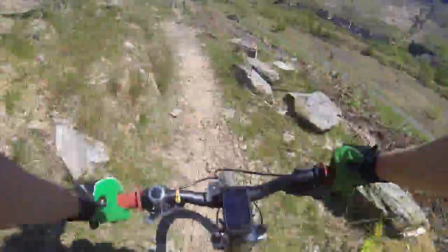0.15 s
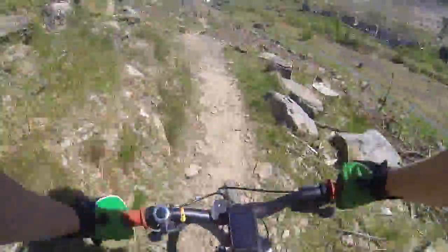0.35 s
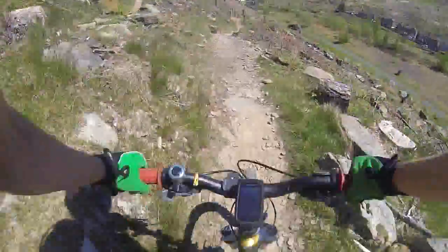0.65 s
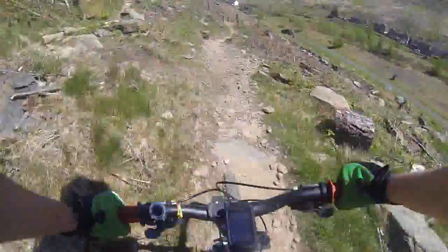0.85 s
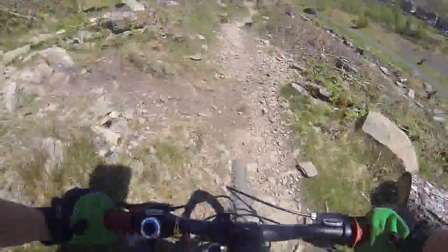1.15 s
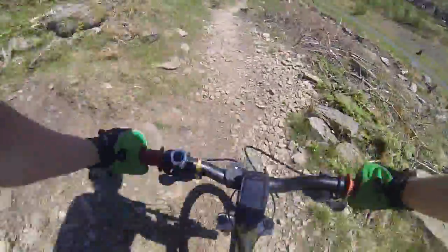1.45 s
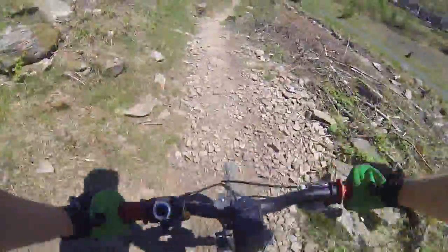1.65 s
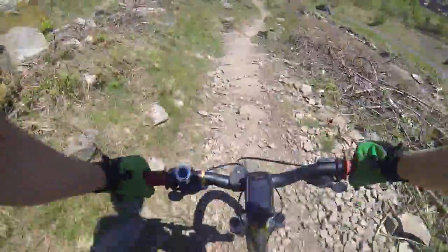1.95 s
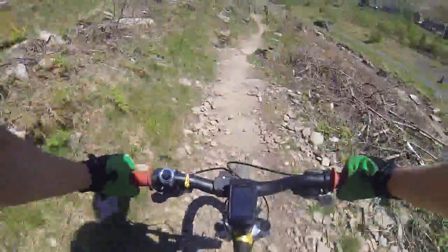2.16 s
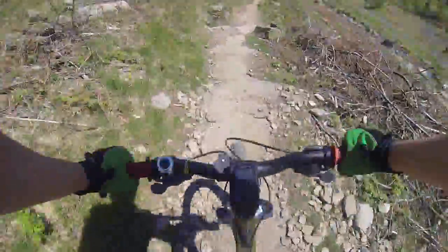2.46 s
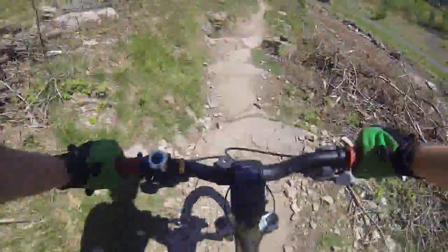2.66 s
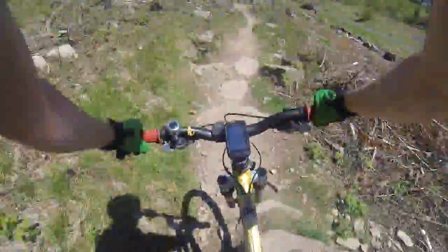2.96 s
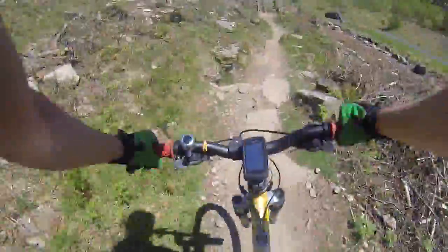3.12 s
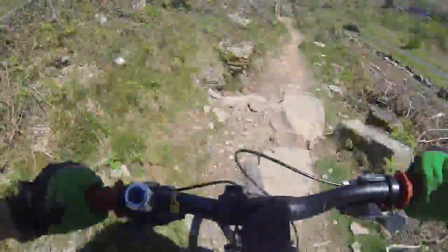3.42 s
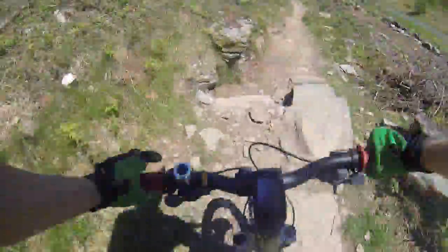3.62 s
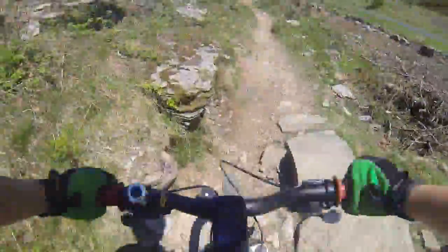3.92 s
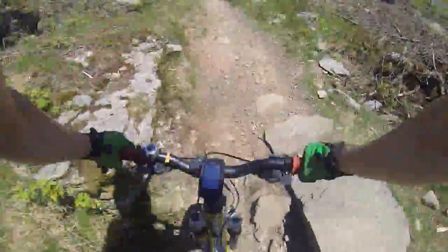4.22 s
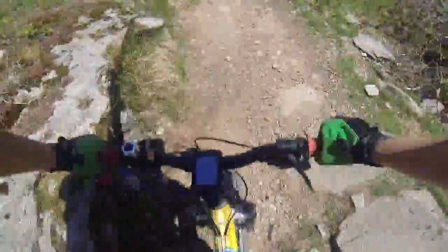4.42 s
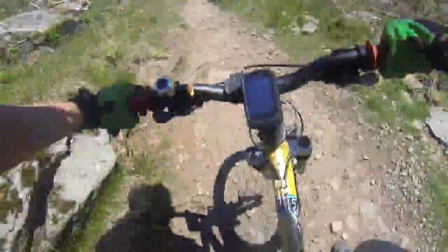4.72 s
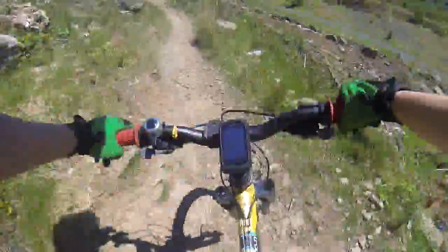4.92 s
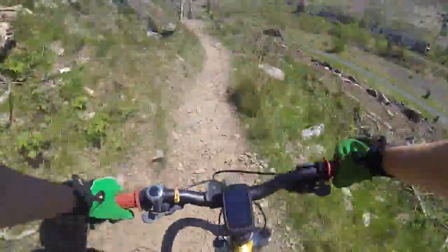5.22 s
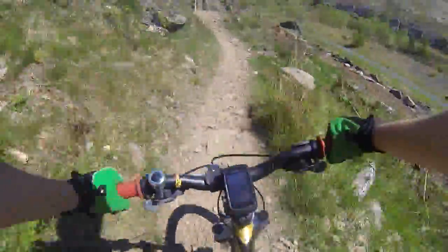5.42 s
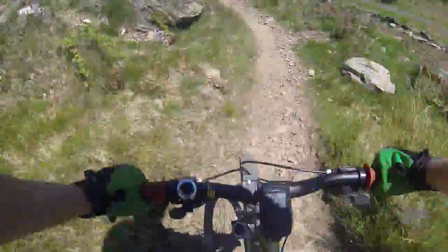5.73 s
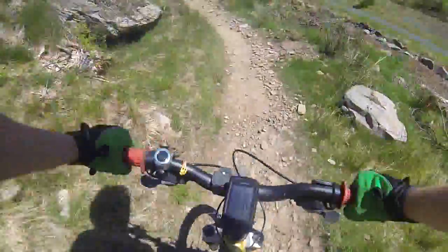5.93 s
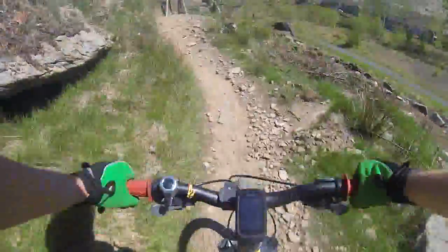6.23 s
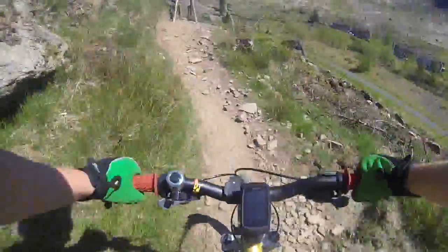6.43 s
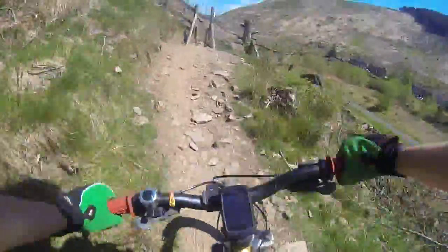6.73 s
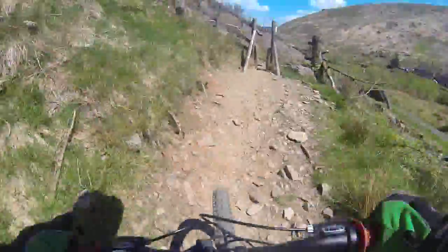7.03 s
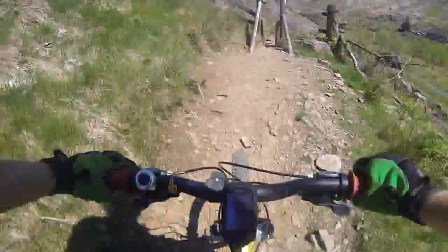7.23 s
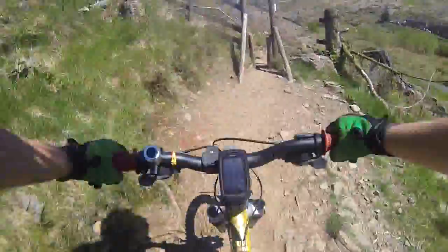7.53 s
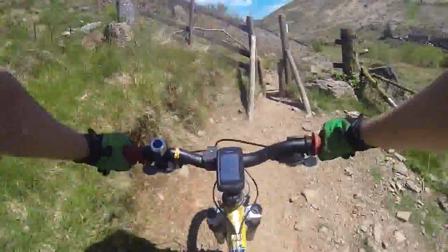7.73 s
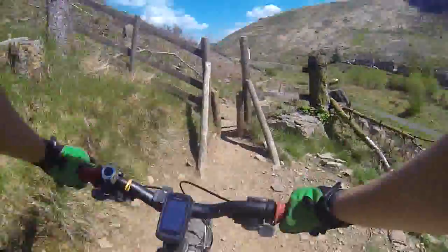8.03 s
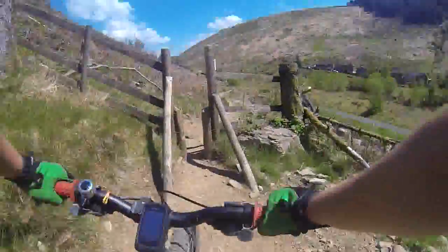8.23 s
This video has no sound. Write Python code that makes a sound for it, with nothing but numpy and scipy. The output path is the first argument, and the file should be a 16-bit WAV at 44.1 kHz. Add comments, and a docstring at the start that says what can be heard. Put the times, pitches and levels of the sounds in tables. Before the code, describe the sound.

A sealed camera case rattles and clacks on a rider's chest, with bassy jolts, low rumbling and dull tyre crunch over loose stones.

```python
"""A camera in a sealed plastic case knocks about on the chest of a mountain biker on a stony trail.
Each knock is a short ring, a buzz, a click and a hollow push, the last three sent through case resonances.
Jolts thump as short low swings with a scuff of the straps; a faint treble hiss is lumpy, coloured noise.
Behind them the body heaves, the harness shudders and the tyres crunch on gravel, muffled by the case."""
import sys
import numpy as np
from scipy import signal
from scipy.fft import rfft, irfft, next_fast_len
from scipy.io import wavfile
from scipy.ndimage import map_coordinates

SR = 44100
rng = np.random.default_rng(int(sys.argv[2]) if len(sys.argv) > 2 else 0)


def generate_wav(signal):
    """Clip the signal to [-1, 1] and save it as 16-bit WAV at the path in sys.argv[1]."""
    frames = np.transpose(np.atleast_2d(signal))
    scaled = np.clip(frames, -1, 1) * 32767
    pcm = np.round(scaled).astype(np.int16)
    wavfile.write(sys.argv[1], SR, pcm)


N = 369116

# Camera against case. Each row: start in seconds, level in dB, ring in Hz, click against the knock in dB.
KNOCKS = [(0.0148, -12, 1410, -60), (0.026, -21, 1560, -30.5), (0.044, -33, 1590, -27),
          (0.0935, -24, 1340, -67), (0.219, -29, 1580, -43), (0.267, -30, 1470, -40),
          (0.33, -33, 1500, -33), (0.4228, -23, 1480, -41), (0.47, -42, 1500, -31),
          (0.485, -29.5, 1570, -25), (0.6508, -15.5, 1430, -43), (0.7544, -13, 1370, -43),
          (0.7979, -6.5, 1384, -13.5), (0.805, -2.5, 1660, -44), (1.007, -9, 1390, -13.5),
          (1.0215, -16.5, 1430, -15), (1.071, -25.5, 1190, -22), (1.119, -33, 1660, -18.5),
          (1.155, -10.5, 1350, -18.5), (1.1713, -22, 1330, -45), (1.302, -28.5, 1270, -37),
          (1.3362, -11.5, 1240, -63), (1.399, -21, 1470, -65), (1.4461, -12, 1330, -12.5),
          (1.454, -2.5, 1580, -47), (1.5177, -26, 1320, -36), (1.531, -32.5, 1590, -17),
          (1.5416, -24.5, 1220, -25), (1.5899, -13.5, 1426, -14.5), (1.7602, -22.5, 1560, -53),
          (1.805, -27.5, 1240, -58), (1.823, -27.5, 1250, -52.5), (1.8855, -20.5, 1470, -81),
          (1.9536, -29, 1260, -8), (1.969, -11.5, 1460, -7.5), (2, -24.5, 1330, -40),
          (2.04, -35.5, 1470, -15), (2.1127, -20, 1100, -31), (2.1494, -23, 1110, -54),
          (2.2111, -14, 1140, -42), (2.229, -35, 1500, -30), (2.2499, -15, 1130, -19.5),
          (2.279, -5, 1357, -16.5), (2.3559, -10.5, 1340, -15), (2.3635, -20, 1280, -57),
          (2.3903, -12.5, 1310, -16.5), (2.522, -16, 1270, -56), (2.5652, -12, 1650, -26.5),
          (2.613, -12, 1440, -28.5), (2.6506, -20.5, 1330, -37), (2.676, -33, 1500, -47),
          (2.6846, -17, 1160, -51), (2.69, -25, 1370, -43), (2.7261, -19, 1490, -55),
          (2.751, -28, 1170, -68), (2.7625, -23, 1500, -50), (2.8039, -20.5, 1620, -24),
          (2.8403, -8.5, 1240, -57), (2.8954, -15.5, 1450, -36), (2.907, -29, 1490, -29),
          (2.929, -21.5, 1540, -23), (2.9393, -23, 1290, -19), (2.972, -17.5, 1520, -14.5),
          (2.978, -10, 940, -28), (2.993, -30.5, 1530, -10), (3.0591, -25, 1320, -16.5),
          (3.1112, -21, 1400, -15), (3.1332, -20, 1420, -13), (3.1732, -22, 1200, -19.5),
          (3.2082, -32, 1680, -47), (3.281, -25, 1430, -24.5), (3.342, -31, 1500, -43),
          (3.352, -22, 1640, -29), (3.3961, -7.5, 1280, -58), (3.401, -19, 1660, -30),
          (3.4207, -20.5, 1300, -18.5), (3.4261, -4.5, 1470, -30.5), (3.4403, -22.5, 1630, -10.5),
          (3.4494, -28, 1520, -37), (3.463, -31, 1600, -12), (3.4684, -28.5, 1510, -17.5),
          (3.483, -17, 1090, -26), (3.507, -24.5, 1300, -17), (3.5224, -15.5, 1420, -19.5),
          (3.5351, -19, 1430, -12), (3.557, -30, 1500, -45), (3.572, -28, 1570, -24),
          (3.68, -26, 1520, -29), (3.6853, -7, 1290, -38), (3.7057, -19.5, 1460, -48),
          (3.732, -29, 1490, -34), (3.7402, -25, 1500, -28.5), (3.7907, -26, 1290, -45),
          (3.846, -25.5, 1420, -60), (3.932, -26.5, 1480, -21), (3.9457, -22, 1350, -30),
          (3.9516, -14, 1350, -24.5), (3.963, -7.5, 1550, -28), (3.984, -15, 1400, -17.5),
          (3.9997, -7, 1340, -53), (4.0534, -10.5, 1415, -13), (4.088, -34, 1450, -17),
          (4.127, -27, 1230, -40), (4.133, -36, 1400, -40), (4.1483, -22, 1630, -7.5),
          (4.191, -32, 1510, -25), (4.196, -21.5, 1460, -23), (4.2048, -6.5, 1540, -33),
          (4.236, -21, 1400, -25), (4.249, -42, 1400, -45), (4.257, -35, 1200, -50),
          (4.2849, -19, 1430, -12), (4.354, -25, 1200, -19), (4.3647, -26.5, 1430, -18),
          (4.38, -16, 1520, -17), (4.408, -15.5, 1370, -23), (4.4322, -3, 1325, -29),
          (4.4576, -35, 1290, -30), (4.4684, -31, 1670, -29), (4.489, -44, 1300, -33),
          (4.526, -28, 1280, -36), (4.533, -28, 1470, -27), (4.5584, -24, 1590, -10.5),
          (4.6212, -17, 1500, -29), (4.6607, -25, 1390, -24), (4.682, -27, 1470, -40),
          (4.7392, -32, 1260, -17), (4.7661, -13, 1394, -15), (4.788, -44, 1400, -33),
          (4.8185, -25, 1210, -20), (4.884, -25.5, 1110, -15), (4.9142, -16, 1380, -15),
          (4.9651, -30.5, 1680, -15), (5.003, -53, 1400, -46), (5.07, -31, 1390, -49),
          (5.079, -39.5, 1690, -50), (5.117, -29, 1170, -53), (5.157, -12, 1390, -61),
          (5.173, -23.5, 1180, -19), (5.2145, -13, 1550, -13.5), (5.385, -18.5, 1190, -30),
          (5.4092, -26, 1380, -20), (5.432, -34, 1490, -15), (5.45, -9.5, 1430, -16.5),
          (5.473, -12.5, 1120, -60), (5.536, -26, 1460, -47), (5.556, -18.5, 1480, -52),
          (5.591, -24, 1110, -20), (5.6296, -7.5, 1394, -17.5), (5.645, -20, 1180, -30),
          (5.654, -24, 1320, -19), (5.7062, -19, 1470, -22.5), (5.738, -29, 1230, -14),
          (5.761, -8, 1396, -14), (5.8973, -22, 1500, -22), (5.926, -20, 1340, -19),
          (5.933, -2.5, 1506, -36.5), (5.996, -27, 1150, -44), (6.028, -28, 1340, -70),
          (6.1124, -23.5, 1470, -24.5), (6.193, -13, 1424, -15), (6.3008, -11.5, 1170, -13.5),
          (6.3194, -25.5, 1170, -39), (6.374, -15.5, 1570, -53), (6.408, -23, 1130, -57),
          (6.5345, -15, 1140, -21.5), (6.5563, -13, 1620, -7), (6.5928, -17, 1270, -21),
          (6.625, -14, 1610, -13), (6.64, -19, 1050, -28), (6.665, -18, 1090, -24),
          (6.6949, -19.5, 1270, -70), (6.839, -11.5, 1280, -49), (6.895, -23, 1320, -26.5),
          (6.9296, -9.5, 1460, -28), (7.011, -19.5, 1500, -12), (7.0319, -14.5, 1430, -13.5),
          (7.0418, -20, 1310, -37), (7.0744, -25, 1190, -17), (7.088, -14.5, 1530, -8.5),
          (7.1277, -13.5, 1360, -15.5), (7.1935, -27, 1210, -11), (7.2064, -12.5, 1550, -12),
          (7.342, -16.5, 1270, -67), (7.4847, -9, 1420, -9), (7.5022, -26, 1610, -17),
          (7.508, -26, 1540, -14), (7.531, -26.5, 1540, -23), (7.552, -42, 1510, -45),
          (7.5845, -11, 1530, -14.5), (7.658, -29.5, 1280, -44), (7.663, -42, 1500, -59),
          (7.693, -29, 1480, -55), (7.761, -27.5, 1360, -43), (7.826, -25.5, 1290, -61),
          (7.903, -28.5, 1320, -56), (7.977, -29, 1570, -48), (8, -34, 1500, -26), (8.008, -26, 1450, -63),
          (8.0356, -24.5, 1340, -57), (8.0608, -58, 1490, -64), (8.231, -20.5, 1390, -26),
          (8.3041, -6.5, 1760, -10), (8.3147, -3.5, 1440, -24), (8.3496, -22.5, 1550, -13)]
# Jolts through the harness. Each row: middle in seconds, level in dB, pitch in Hz.
JOLTS = [(0.015, -16.5, 180), (0.095, -19, 109), (0.144, -28, 61), (0.199, -26.5, 62.4), (0.235, -21.5, 96),
         (0.273, -23, 133), (0.314, -20.5, 108), (0.424, -17.5, 132), (0.48, -22, 70), (0.53, -20.5, 131),
         (0.601, -25.5, 71), (0.656, -14.5, 145), (0.759, -16.5, 167), (1.01, -23, 108), (1.302, -22, 193),
         (1.34, -26.5, 60), (1.418, -17, 57.6), (1.48, -28.5, 70), (1.597, -38, 76), (1.768, -15.5, 155),
         (1.889, -15.5, 113), (1.957, -20.5, 186), (1.985, -21, 60), (2.209, -22, 75), (2.329, -21.5, 65),
         (2.526, -27, 79.6), (2.618, -18, 89.5), (2.692, -24.5, 142), (2.725, -19.5, 149),
         (2.77, -9.5, 104), (2.841, -8.5, 88), (2.899, -11, 86), (2.946, -11.5, 94), (2.981, -5.5, 171),
         (3.393, -12.5, 98), (3.431, -16.5, 138), (3.475, -19, 133), (3.557, -18.5, 89), (3.684, -8.5, 142),
         (3.713, -18, 131), (3.735, -15, 107), (3.881, -23, 95.5), (3.95, -16.5, 126), (3.984, -16.5, 119),
         (4.062, -10, 105), (4.191, -25, 102), (4.314, -23.5, 90), (4.371, -13.5, 149), (4.435, -9.5, 151),
         (4.485, -10, 76), (4.697, -16.5, 128), (4.79, -14, 100), (5.03, -17.5, 141), (5.158, -16.5, 173),
         (5.411, -16, 135), (5.477, -22, 170), (5.556, -23.5, 120), (5.632, -18.5, 136),
         (5.764, -17.5, 102), (6.079, -21.5, 89), (6.191, -22.5, 127), (6.562, -18, 82),
         (6.645, -18.5, 83.5), (6.695, -24.5, 102), (6.842, -12, 175), (6.88, -16, 105),
         (6.893, -16.5, 104), (6.7, -17, 60), (6.926, -2.5, 123), (7.032, -26, 100), (7.131, -21.5, 85),
         (7.209, -19.5, 98), (7.265, -27, 80), (7.345, -23.5, 75), (7.585, -32, 110), (7.619, -20.5, 88.5),
         (7.663, -17, 89), (7.68, -19.5, 70), (7.761, -21.5, 110), (7.832, -29, 130), (8.043, -18, 89),
         (8.07, -17, 72.5), (8.235, -18.5, 133), (8.15, -31, 55), (8.304, -16.5, 122)]
# Lower modes of the case wall. Each row: centre in Hz, width in Hz, relative level in dB.
WALL_MODES = [(1480, 190, 5), (2352, 99, -5.5), (2347, 135, 1), (2910, 22, -12.5), (3190, 63, -11)]


def knocks():
    """Contacts ring the wall, the upper modes and the hollow of the case."""
    # air and lid of the case; each row: centre in Hz, width in Hz, relative level in dB
    hollow_modes = [(280, 530, -1.5), (506, 151, 4), (763, 65, -2)]
    # upper modes of the case; each row: centre in Hz, width in Hz, relative level in dB
    upper_modes = [(4964, 285, 3), (6240, 270, -1.5), (6990, 250, -7), (7930, 550, -6), (9230, 660, -8),
                   (11020, 200, -9), (13200, 630, -20.5)]
    rings, buzzes, clicks, pushes = np.zeros((4, N + SR))
    t = np.arange(SR // 8) / SR
    for s, db, hz, hollow_db, click_db in contacts():
        start = round(s * SR)
        at = slice(start, start + len(t))
        # a dull contact is a soft one: it builds up more slowly
        rise_s = 0.00037 * amp(-0.2 * (click_db + 18))
        rise = 1 - np.exp(-(t / rise_s) ** 2)
        rings[at] += ring(t, db, hz, click_db, rise)
        buzzes[at] += amp(db + 0.83 * click_db + 29) * buzz(t, rise)
        clicks[at] += amp(db + click_db + 26.5) * click(t, db, click_db)
        pushes[at] += amp(db + hollow_db + 38.5) * push(t, rise)
    wall = ringing(buzzes[:N], WALL_MODES)
    # the whole case is shoved, too slowly for any treble
    hollow = filtered(ringing(pushes[:N], hollow_modes), lambda f: (1 + 1j * f / 1500) ** -2)
    # only the sharp edge of a contact reaches the upper modes
    bright = filtered(ringing(clicks[:N], upper_modes), lambda f: 1j * f / (4000 + 1j * f))
    return muffled(rings[:N] + wall + hollow) + bright


def contacts():
    """Every knock, then its one weak rebound; rows end in hollow and click parts against the contact in dB."""
    s, db, hz, click_db = np.transpose(KNOCKS)
    chance = rng.standard_normal((len(s), 4))
    # the hollow part rises more slowly than the knock; lower rings, rougher ground and duller clicks raise it
    hollow_db = -31 + 0.69 * (db + 18.5) - 6 * np.log2(hz / 1400) + 0.5 * chance[:, 0]
    hollow_db = hollow_db + 7.5 * roughness()[(s * SR).astype(int)] - 0.016 * (click_db + 31.5)
    hollow_share_db = hollow_db - db
    delay_s = 0.013 * amp(4.5 * chance[:, 1])
    loss_db = 29.5 + 5.5 * chance[:, 2]
    rebound_hz = hz * amp(0.35 * chance[:, 3])
    first = zip(s, db, hz, hollow_share_db, click_db)
    rebounds = zip(s + delay_s, db - loss_db, rebound_hz, hollow_share_db, click_db)
    return [*first, *rebounds]


def ring(t, db, hz, click_db, rise):
    """A sharp contact sets the wall ringing for longer; a dull one damps it."""
    length_s = 0.0019 * amp(0.32 * (max(click_db, -35) + 21))
    swell = (1 - np.exp(-(t / 0.0004) ** 2)) * np.exp(-(t / length_s) ** 1.4)
    low = amp(db + 2) * np.sin(2 * np.pi * hz * t) * swell
    # each contact lands elsewhere on the wall and finds another overtone
    over_hz = 1.982 * hz * amp(2.5 * rng.standard_normal())
    over = amp(db - 2 + 0.49 * click_db) * np.sin(2 * np.pi * over_hz * t)
    return low + over * rise * decay(t, 0.0075)


def buzz(t, rise):
    """Loose parts buzz on after the blow: noise with two decays, of energy 1."""
    x = rng.standard_normal(len(t)) * rise * (decay(t, 0.03) + 0.37 * decay(t, 0.023))
    return x / np.linalg.norm(x)


def click(t, db, click_db):
    """Chatter of energy 1 with a faint tail; a duller or weaker contact reaches less high."""
    chance = rng.standard_normal(len(t))
    length_s = 0.0032 * amp(3 * chance[1])
    chatter = chance * (decay(t, length_s) + 0.035 * decay(t, 0.13))
    reach_hz = 10900 * amp(click_db + 18 + 0.21 * (db + 13) + 2.5 * chance[0])
    keep = np.exp(-2 * np.pi * reach_hz / SR)
    chatter = signal.lfilter([1], [1, -2 * keep, keep ** 2], chatter)
    return chatter / np.linalg.norm(chatter)


def push(t, rise):
    """A push on the case: a noise burst of energy 1, after which the lid rattles on."""
    x = rng.standard_normal(len(t)) * rise * (decay(t, 0.0091) + 0.24 * decay(t, 0.045))
    return x / np.linalg.norm(x)


def thumps():
    """Each jolt is a soft swing of about a cycle and a half, a slower sink and a rough scuff of the straps."""
    # colour of the straps; each row: frequency in Hz, relative level in dB
    strap_colour = [(100, -17), (250, 5), (400, -9), (900, -14), (1500, -14), (2500, -35.5), (4000, -79)]
    swings, scuff_level = np.zeros((2, N + SR))
    lead = SR // 50  # samples ahead of the middle
    t = np.arange(-lead, SR // 10) / SR
    # every knock also shoves the harness
    shoves = [(s, -31.5 + 0.44 * (db + 19.5), 147) for s, db, *_ in KNOCKS]
    for s, db, hz in JOLTS + shoves:
        start = round(s * SR)
        at = slice(start, start + len(t))
        turns = hz * t
        shape = np.exp(-(turns / np.where(turns < 0, 0.45, 0.7)) ** 2)
        swings[at] += amp(db + 2) * np.sin(2 * np.pi * (turns + rng.random())) * shape
        # the slower swing, at 0.36 of the pitch and of either sign
        sink = np.maximum(0.36 * (turns + 0.5), 0)
        swings[at] += amp(db - 2) * np.sin(2 * np.pi * sink) * np.exp(-sink ** 2) * rng.choice([-1, 1])
        scuff_level[at] += amp(db - 18.5) * np.exp(-(t / np.where(t < 0, 0.006, 0.008)) ** 2)
    return swings[lead:][:N] + scuff_level[lead:][:N] * noise(strap_colour)


def knock_hiss():
    """A faint treble hiss trails every knock, more after a sharper one: coloured noise that decays."""
    # each row: frequency in Hz, relative level in dB
    trail_colour = [(1800, -31.5), (2600, 4.5), (4200, -7.5), (5600, -10), (7000, -43), (8500, -120)]
    decay_s = 0.19  # to -60 dB
    s, db, _, click_db = np.transpose(KNOCKS)
    blow_db = -58 + (db + 11.5) + 0.2 * (click_db + 21)
    blows = np.bincount((s * SR).astype(int), amp(blow_db), N)
    level = signal.lfilter([1], [1, -amp(-60 / (decay_s * SR))], blows)
    return level * unit(amp(1.3 * wobble(170)) * noise(trail_colour))


def hiss():
    """Faint treble hiss between the knocks, in uneven lumps; its higher band swells with the lower."""
    # each row: time in seconds, level in dB ahead of roughness
    hiss_rows = [(0.0, -70), (0.25, -69), (0.61, -70.5), (0.84, -58.5), (1.91, -71), (2.19, -62),
                 (2.54, -64), (2.98, -66), (3.1, -78), (3.42, -55.5), (3.57, -64.5), (3.71, -86),
                 (3.96, -56), (4.1, -58.5), (4.8, -59.5), (4.97, -69), (5.15, -65.5), (5.59, -58),
                 (5.94, -61), (6.32, -62.5), (6.85, -77.5), (6.99, -54.5), (7.08, -54), (7.25, -76),
                 (7.39, -74.5), (8.25, -66), (8.37, -48)]
    # lower and higher band; each row: frequency in Hz, relative level in dB
    hiss_colour = [(1800, -40.5), (2700, 5), (3800, 4), (4600, -26.5), (5600, -45), (6500, -120)]
    high_colour = [(3000, -36.5), (4500, 6.5), (6000, -3.5), (9000, -9), (12000, -15.5), (15000, -22)]
    hiss_db = curve(hiss_rows) + 9 * (roughness() - 0.5)
    high_db = np.minimum(-67 + 2.3 * (hiss_db + 64), hiss_db + 5.5)
    lumps = amp(9 * wobble(40) + 5.5 * wobble(210))
    low_hiss = amp(hiss_db) * unit(lumps * noise(hiss_colour))
    high_hiss = amp(high_db) * unit(lumps * noise(high_colour))
    return low_hiss + high_hiss


def heave():
    """The rider's body heaves: low noise whose widest swings are held back as the straps stiffen."""
    # each row: frequency in Hz, relative level in dB per Hz
    heave_colour = [(3, -30.5), (8, 2.5), (15, 7.5), (24, 2), (38, -7.5), (60, -16.5), (100, -56),
                    (200, -120)]
    swings = np.tanh(0.45 * noise(heave_colour))
    return amp(heave_level()) * unit(amp(1.65 * wobble(5)) * swings)


def shudder():
    """The harness shudders in lumps of low noise that follow both the body and the gravel."""
    # each row: frequency in Hz, relative level in dB per Hz
    shudder_colour = [(30, -9.5), (65, -4), (110, -20), (200, -28), (350, -37), (700, -59.5), (1200, -120)]
    lumps = unit(amp(4.5 * wobble(18)) * noise(shudder_colour))
    return amp(0.37 * heave_level() + 0.4 * gravel_level() - 1.5) * lumps


def tyres():
    """Gravel crunches in clumps and pebbles tick against the frame, heard through the case wall."""
    # each row: frequency in Hz, relative level in dB per Hz
    gravel_colour = [(200, -33), (500, 15.5), (900, 3), (1500, -7), (1900, -9), (2150, -4), (2450, -9),
                     (2900, -22), (4000, -11), (6000, -44)]
    # the wall's modes lie lower under lighter strap pressure and higher under firmer
    walls = [[(hz * shift, width, db) for hz, width, db in WALL_MODES] for shift in (0.92, 1.07)]
    crunch = np.zeros(N)
    for wall in walls:
        clumps = amp(3 * wobble(18) + 3.34 * wobble(150))
        crunch += ringing(clumps * noise(gravel_colour), wall)
    crunch = unit(amp(1.4 * wobble(3.2) + 3 * wobble(30)) * crunch)
    # about 150 pebbles a second; few are much louder than the rest
    ticks = (rng.random(N) < 150 / SR) * rng.standard_normal(N)
    ticks = ticks * amp(3.5 * rng.exponential(size=N))
    # reversed in time, the same ticks serve as a second set
    pebbles = unit(ringing(ticks, walls[0]) + ringing(ticks[::-1], walls[1]))
    gravel_db = gravel_level()
    return muffled(amp(gravel_db) * crunch + amp(gravel_db - 6) * pebbles)


def heave_level():
    """Level of the heaving body in dB; it heaves harder on rough ground."""
    # each row: time in seconds, level in dB ahead of roughness
    body_rows = [(0.0, -9.5), (0.35, -13.5), (0.77, -8), (0.95, -26), (1.33, -22), (1.35, -2.5),
                 (1.56, -20.5), (2.91, -11), (3.08, -36), (3.4, -12), (3.5, -22), (3.98, -12.5),
                 (4.31, -18.5), (4.38, -18), (4.59, -26.5), (5.71, -12), (5.78, -22.5), (6.48, -19),
                 (6.81, -6.5), (7.13, -20.5), (8.14, -11), (8.28, -16), (8.37, -44)]
    return curve(body_rows) + 3 * (roughness() - 0.5)


def gravel_level():
    """Level of the tyres in dB ahead of the muffling; rough ground crunches more."""
    # each row: time in seconds, level in dB ahead of roughness
    trail_rows = [(0.0, -49.5), (0.65, -45.5), (0.79, -46.5), (1.02, -55), (1.19, -50), (2.03, -47.5),
                  (2.58, -47), (2.77, -50.5), (3.12, -52), (3.61, -50), (3.75, -52), (4.2, -45),
                  (4.48, -55), (4.89, -54.5), (5.45, -45), (5.59, -46), (5.74, -50), (6.41, -46),
                  (6.76, -45.5), (6.97, -47.5), (7.25, -51.5), (8.37, -45.5)]
    return curve(trail_rows) + 14.5 * (roughness() - 0.5)


def roughness():
    """Between 0 and 1: high around the jolts, where the ground is rougher."""
    reach_s, half_db = 0.041, -10.5  # spread of a jolt, and the jolt that gives one half
    t = np.arange(0, N, 64) / SR
    near = sum(amp(db) * np.exp(-((t - s) / reach_s) ** 2) for s, db, _ in JOLTS)
    return np.interp(np.arange(N) / SR, t, near / (near + amp(half_db)))


def muffled(x):
    """The closed case and soft contacts pass little above a few kilohertz."""
    return filtered(x, lambda f: (1 + 1j * f / 5200 - (f / 3900) ** 2) ** -3)


def ringing(x, modes):
    """x sent through broad resonances of alternating sign."""
    def response(f):
        total = 0
        for k, (centre, width, db) in enumerate(modes):
            damping = 1j * f * width
            total = total + (-1) ** k * amp(db) * damping / (centre ** 2 - f ** 2 + damping)
        return total
    return filtered(x, response)


def noise(points):
    """Noise of rms 1 with a spectrum drawn through (Hz, dB) points."""
    f, db = np.transpose(points)

    def response(hz):
        return amp(np.interp(np.log(hz + 1), np.log(f + 1), db))
    return unit(filtered(rng.standard_normal(N), response))


def filtered(x, response):
    """x times a complex response of frequency, padded against wrap-around."""
    m = next_fast_len(N + SR // 2)
    return irfft(rfft(x, m) * response(np.fft.rfftfreq(m, 1 / SR)), m)[:N]


def wobble(rate):
    """A smooth random curve, rate knots a second."""
    knots = rng.standard_normal(int(N * rate / SR) + 4)
    return map_coordinates(knots, [np.arange(N) * rate / SR])


def curve(rows):
    """One value per sample from (seconds, value) rows."""
    return np.interp(np.arange(N) / SR, *np.transpose(rows))


def decay(t, t60_s):
    """An exponential decay that falls 60 dB in t60_s seconds."""
    return amp(-60 * t / t60_s)


def amp(db):
    """Decibels to a linear factor."""
    return 10 ** (np.asarray(db) / 20)


def unit(x):
    """x at rms 1."""
    return x / np.sqrt(np.mean(x ** 2) + 1e-20)


def scene():
    """The knocks and thumps up close, the faint hiss around them and the ride behind, in one channel."""
    ride = heave() + shudder() + tyres()
    return (knocks() + thumps() + knock_hiss() + hiss() + ride)[None]


def record(dry):
    """The camera's input saturates at full scale and keeps nothing from 14610 Hz up."""
    soft = dry[0] / (1 + np.abs(dry[0]) ** 8) ** (1 / 8)
    return filtered(soft, lambda hz: hz < 14610)[None]


dry = scene()
out = record(dry)
generate_wav(out)
```